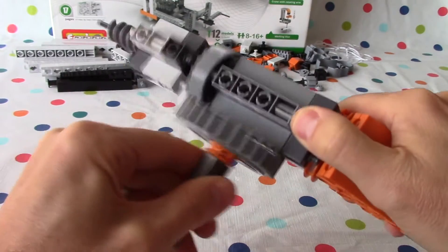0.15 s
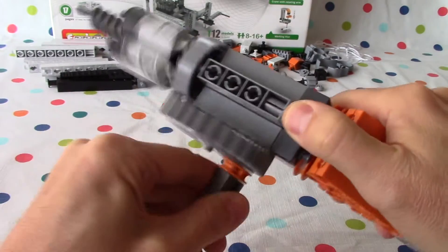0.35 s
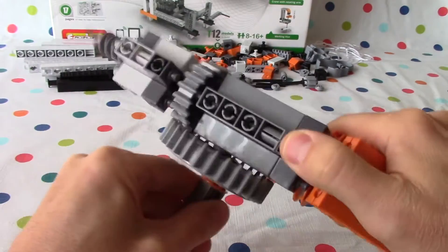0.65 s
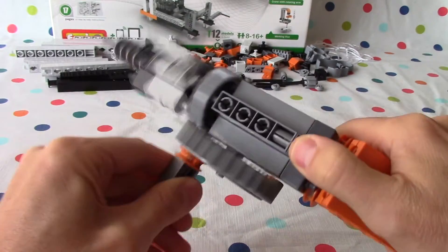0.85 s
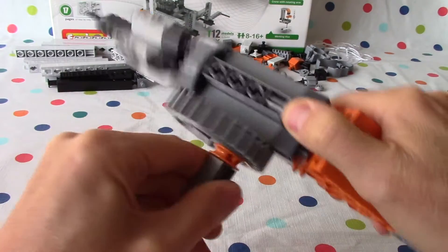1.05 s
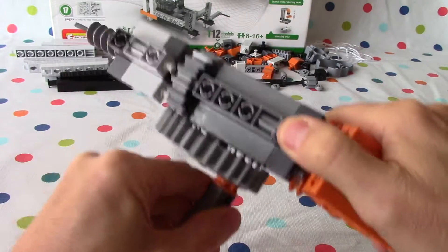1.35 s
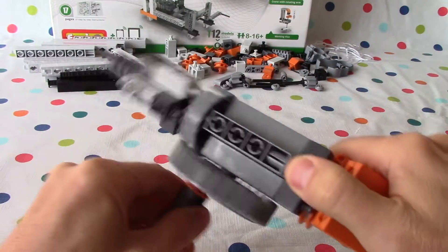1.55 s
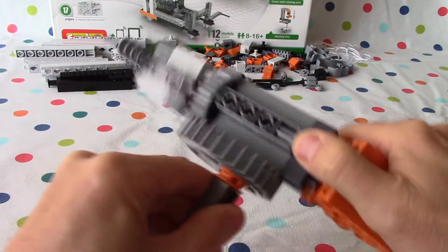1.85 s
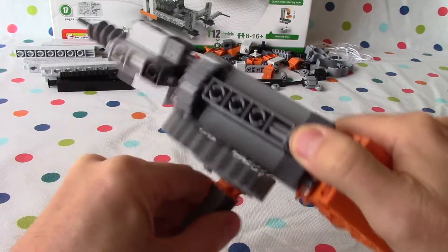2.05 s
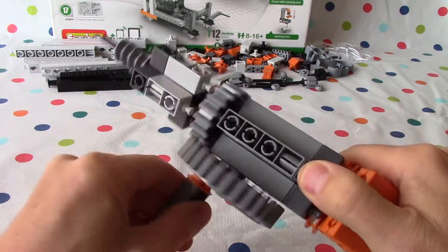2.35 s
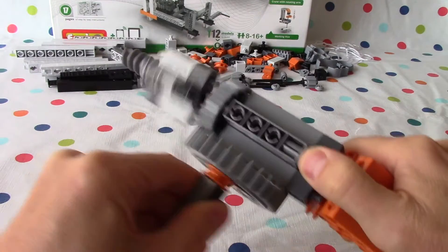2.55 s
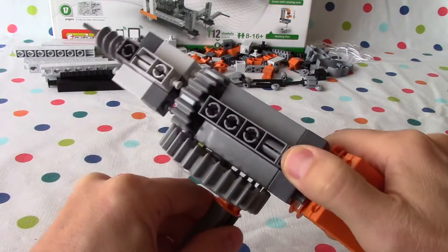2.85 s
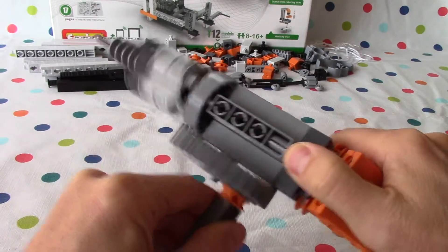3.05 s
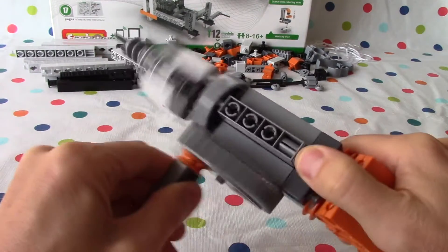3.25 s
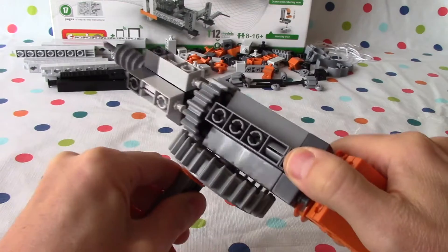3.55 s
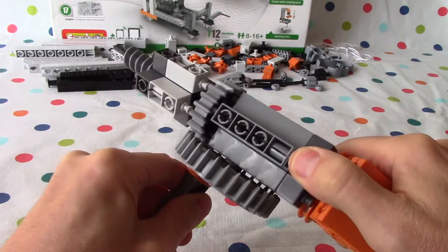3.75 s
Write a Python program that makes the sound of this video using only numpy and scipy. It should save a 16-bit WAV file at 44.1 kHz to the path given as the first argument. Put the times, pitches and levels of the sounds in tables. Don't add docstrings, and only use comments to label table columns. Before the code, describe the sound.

Plastic toy gears clatter and rasp in uneven hand-cranked bursts, close up in a quiet room

```python
import sys
import numpy as np
from scipy import signal
from scipy.fft import rfft, irfft, next_fast_len
from scipy.io import wavfile
from scipy.ndimage import map_coordinates

SR = 44100
rng = np.random.default_rng(int(sys.argv[2]) if len(sys.argv) > 2 else 0)


def convert_level_to_amplitude(level_db):
    exponent = np.asarray(level_db, float) / 20
    return 10 ** exponent


def generate_wav(signal):
    frames = np.transpose(np.atleast_2d(signal))
    scaled = np.clip(frames, -1, 1) * 32767
    pcm = np.round(scaled).astype(np.int16)
    wavfile.write(sys.argv[1], SR, pcm)


N = 171990

# start t/s, length t/s, rub level/dB, low thud level/dB
STROKES = [(0.144, 0.057, -26.5, -32), (0.273, 0.1, -33, -5.5), (0.546, 0.035, -10, 10),
           (0.635, 0.16, -40, -9), (0.929, 0.17, -25, -13.5), (1.237, 0.062, -20, -2),
           (1.415, 0.13, -20.5, 11), (1.57, 0.3, -51.5, 1.5), (1.674, .11, -32.5, -11),
           (1.82, 0.18, -25, -53), (1.977, 0.14, -29, 1.5), (2.225, 0.044, -13, 2), (2.356, 0.11, -53, -16),
           (2.451, 0.3, -23, -11.5), (2.945, 0.094, -61, 12), (3.013, 0.122, -15, -20),
           (3.242, 0.046, -20, -6), (3.291, 0.056, -16, -4.5), (3.414, .02, -52, -6)]


def unit(x):
    return x / np.sqrt(np.mean(x ** 2) + 1e-20)


def along(points, hz):
    f, value = np.transpose(points)
    return np.interp(np.log(hz + 1), np.log(f + 1), value)


def nearest(rows, at_s):
    s, value = np.transpose(rows)
    distance = np.abs(at_s[:, None] + 0.005 - s)
    return value[distance.argmin(1), None]


def wobble(rate):
    knots = rng.standard_normal(int(N * rate / SR) + 4)
    return map_coordinates(knots, [np.arange(N) * rate / SR])


def lay(rows, starts):
    at = starts[:, None] + np.arange(rows.shape[1])
    return np.bincount(at.ravel(), rows.ravel(), N + SR)[:N]


def impacts(size, per_s, spread_db):
    chance, extra, sign = rng.random(size), rng.exponential(size=size), rng.standard_normal(size)
    happens = np.clip((per_s / SR - chance) * SR / 300 + 0.5, 0, 1)
    return unit(happens * sign * convert_level_to_amplitude(spread_db * np.minimum(extra, 2)))


def resonance(f, hz, width):
    return 1j * f * width / (hz ** 2 - f * f + 1j * f * width)


def body(x, at_s):
    # f/Hz, width f/Hz, level/dB
    frame_rings = [(690, 120, -2), (1000, 150, 3), (1700, 250, -2), (2500, 250, 0), (3300, 300, 2),
                   (4150, 300, 0), (5800, 250, 1), (6700, 350, 2), (8600, 500, 1)]
    # f/Hz, level/dB
    plastic = [(90, -62.5), (250, -9), (900, 1.5), (3200, -2.5), (5000, -6), (7000, -7), (13000, -18),
               (16000, -30)]
    grip = np.array([0.5, 1, 2, 0.5, 0.5, 1, 2, 2, 0.5, -0.5, 0, 1.5, -2, 1, 2, 0.5, 0.5, 0.5, -3])
    # t/s, f/Hz
    low_ring = [(0.197, 1580), (0.241, 1630), (0.271, 1660), (0.354, 1910), (0.399, 1640), (0.576, 1680),
                (0.72, 1010), (0.75, 2130), (0.8, 990), (0.872, 1600), (0.913, 880), (0.981, 890),
                (1.014, 1560), (1.045, 1580), (1.26, 2070), (1.318, 1030), (1.416, 1270), (1.447, 1104),
                (1.521, 1860), (1.585, 1560), (1.689, 1650), (1.733, 1410), (1.785, 796), (1.865, 1170),
                (1.907, 1620), (1.965, 900), (2.016, 780), (2.064, 1210), (2.27, 1830), (2.31, 1870),
                (2.434, 1720), (2.473, 1380), (2.505, 1400), (2.56, 1860), (2.609, 1850), (2.656, 1690),
                (2.691, 846), (2.743, 1085), (3.029, 1960), (3.097, 1600), (3.138, 1060), (3.225, 1640),
                (3.257, 910), (3.299, 2000), (3.328, 934)]
    # t/s, f/Hz
    high_ring = [(0.327, 3760), (0.358, 3470), (0.398, 3700), (0.563, 3150), (0.61, 2170), (0.644, 3120),
                 (0.718, 6950), (0.747, 5340), (0.8, 2390), (0.855, 2270), (0.904, 2460), (0.962, 2830),
                 (1.014, 2230), (1.112, 3060), (1.257, 3500), (1.444, 2880), (1.474, 5560), (1.519, 2570),
                 (1.585, 2280), (1.643, 2280), (1.73, 2880), (1.785, 2800), (1.852, 3900), (1.904, 3050),
                 (1.962, 3100), (2.013, 3200), (2.049, 3000), (2.08, 3280), (2.257, 5820), (2.463, 2350),
                 (2.519, 2900), (2.559, 2760), (2.606, 4040), (2.65, 3220), (2.744, 3540), (3.039, 2310),
                 (3.138, 2270), (3.174, 3650), (3.245, 2390), (3.325, 5550)]
    # t/s, f/Hz
    lone_ring = [
        (2.356, 8500),
        (2.407, 2400),
        (2.941, 3350),
    ]
    ring_db, scatter_db, tilt_scatter_db = 1, 5, 1.5
    thud_hz = 653

    m = x.shape[1]
    f = np.fft.rfftfreq(m, 1 / SR)
    start, _, _, thud_db = np.transpose(STROKES)
    push = np.clip(np.searchsorted(start - 0.025, at_s) - 1, 0, None)
    ring_hz, width, db = np.transpose(frame_rings)
    shake = np.clip(rng.standard_normal((len(x), 2, len(ring_hz) + 1)), -2, 1.5)

    tilt_db = grip[push] + tilt_scatter_db * shake[:, 1, -1]
    octaves = np.log2(np.clip(f, 700, 12000) / 2500)
    colour_db = along(plastic, f) + tilt_db[:, None] * octaves
    colour_db = colour_db + thud_db[push, None] / (1 + (f / thud_hz) ** 4)
    cepstrum = irfft(np.log(convert_level_to_amplitude(colour_db) + 1e-6), m)
    cepstrum[:, 1:m // 2] *= 2
    cepstrum[:, m // 2 + 1:] = 0

    ring_hz = ring_hz * (1 + 0.03 * shake[:, 0, :-1])
    ring = 0
    for k in range(len(width)):
        strength = convert_level_to_amplitude(ring_db + db[k] + scatter_db * shake[:, 1, k:k + 1])
        ring = ring + strength * resonance(f, ring_hz[:, k:k + 1], width[k])
    low_hz = nearest(low_ring, at_s)
    high_hz = nearest(high_ring + lone_ring, at_s)
    ring = ring + convert_level_to_amplitude(8) * resonance(f, low_hz, low_hz / 5)
    ring = ring + convert_level_to_amplitude(8) * resonance(f, high_hz, high_hz / 8)

    response = np.exp(rfft(cepstrum)) * (1 + ring)
    strength = np.sqrt(np.mean(np.abs(response) ** 2, 1, keepdims=True))
    return irfft(rfft(x) * response / strength, m)


def tinted(gain):
    return unit(irfft(rfft(rng.standard_normal((2, N))) * gain, N))


def murmur():
    # f/Hz, level/dB per Hz
    air_colour = [(30, -96), (100, -31.5), (200, -6.5), (420, -8), (1100, -11.5), (3000, -26),
                  (7000, -36.5), (12500, -49.5), (16000, -73)]
    # f/Hz, width f/Hz, level/dB
    duct_tones = [(315, 28, -66), (407.3, 3.1, -65)]
    air_db, side_db = -60, -10.5
    f = np.fft.rfftfreq(N, 1 / SR)
    air = convert_level_to_amplitude(air_db + 0.46 * wobble(18)) * tinted(convert_level_to_amplitude(along(air_colour, f)))
    for hz, width, db in duct_tones:
        air = air + convert_level_to_amplitude(db) * tinted(1 / (1 + ((f - hz) / width) ** 2))
    return air * convert_level_to_amplitude(np.array([[0], [side_db]]))


def rub():
    edge_s, slips_per_s, spread_db = 0.02, 6900, 2.5
    rub_db, wobble_db = -12, 3
    t = np.arange(N) / SR
    force = np.zeros(N)
    for start, length, db, _ in STROKES:
        to_edge = np.minimum(t - start, start + length - t)
        force += convert_level_to_amplitude(db) * np.clip(to_edge / edge_s + 0.5, 0, 1) ** 2
    slips = impacts(N, slips_per_s, spread_db) * force * convert_level_to_amplitude(rub_db + wobble_db * wobble(70))
    hop = 1024
    starts = np.arange(0, N - 2 * hop, hop)
    pieces = slips[starts[:, None] + np.arange(2 * hop)] * np.hanning(2 * hop)
    pieces = np.pad(pieces, ((0, 0), (0, 2 * hop)))
    return lay(body(pieces, (starts + hop) / SR), starts)


def catches():
    # t/s, peak level/dB, chatter t/s
    teeth = [(0.1556, -28, 0.018), (0.18, -21.5, 0.049), (0.221, -30.5, 0.012), (0.237, -20.5, 0.0094),
             (0.265, -28, 0.03), (0.3047, -17, 0.013), (0.3127, -14.5, 0.044), (0.3497, -12, 0.034),
             (0.3718, -11, 0.026), (0.3945, -15.5, 0.016), (0.527, -34, 0.02), (0.5387, -29, 0.0098),
             (0.5513, -8.5, 0.064), (0.562, -9, 0.035), (0.57, -16, 0.054), (0.583, -8.5, 0.023),
             (0.607, -21, 0.021), (0.6378, -16, 0.03), (0.678, -18, 0.052), (0.6939, -10.5, 0.018),
             (0.7134, -11.5, 0.025), (0.7336, -18, 0.017), (0.7434, -9, 0.027), (0.7804, -12, 0.023),
             (0.7938, -9, 0.026), (0.818, -13, 0.034), (0.8395, -14, 0.055), (0.8695, -24, 0.02),
             (0.8974, -25, 0.081),
             (0.931, -15, 0.011), (0.9585, -13, 0.049), (1.0092, -8, 0.029), (1.0277, -10, 0.051),
               (1.098, -13.5, 0.045), (1.1101, -17, 0.027), (1.2294, -24, 0.014), (1.2464, -8, 0.035),
               (1.2551, -3, 0.034), (1.2774, -11.5, 0.015), (1.2961, -30.5, 0.041), (1.333, -23, 0.01),
               (1.416, -13, 0.0046), (1.4374, -8.5, 0.025), (1.4458, -8, 0.046), (1.4536, -9.5, 0.011),
               (1.462, -12, 0.005), (1.4703, -4, 0.017), (1.486, -18.5, 0.016), (1.507, -11, 0.038),
               (1.5304, -25, 0.0074), (1.5582, -23.5, 0.015), (1.579, -15, 0.019), (1.631, -21.5, 0.04),
               (1.641, -25, 0.025), (1.66, -21.5, 0.02), (1.676, -35, 0.012), (1.6862, -21, 0.08),
             (1.726, -8.5, 0.036), (1.747, -17, 0.02), (1.7796, -10, 0.019), (1.7948, -9, 0.018),
               (1.8482, -11.5, 0.033), (1.9014, -14, 0.024), (1.936, -18.5, 0.013), (1.943, -7, 0.027),
               (1.9589, -6.5, 0.03), (1.9931, -11.5, 0.078), (2.0122, -5.5, 0.012), (2.027, -20.5, 0.028),
               (2.0483, -8, 0.0074), (2.061, -5.5, 0.0096), (2.0727, -8, 0.045), (2.093, -10, 0.01),
               (2.211, -25.5, 0.027), (2.2405, -9.5, 0.014), (2.247, -1.5, 0.0099), (2.2545, -3.5, 0.016),
               (2.2643, -1.5, 0.017), (2.283, -12, 0.044), (2.2978, -15.5, 0.014), (2.3049, -12, 0.013),
               (2.354, -34, 0.01), (2.377, -34, 0.011), (2.4063, -37, 0.012),
             (2.4292, -16, 0.02), (2.47, -19, 0.033), (2.5015, -16, 0.03), (2.5189, -20.5, 0.023),
               (2.5547, -13, 0.021), (2.5778, -19, 0.03), (2.601, -10, 0.044), (2.648, -7.5, 0.034),
               (2.6666, -8, 0.05), (2.6835, -18.5, 0.035), (2.7281, -11.5, 0.044), (2.7424, -9.5, 0.021),
               (2.9394, -38, 0.015), (2.9612, -34, 0.018), (2.989, -32, 0.015), (2.996, -21, 0.047),
               (3.022, -17.5, 0.034), (3.053, -15.5, 0.025), (3.0945, -16, 0.033), (3.1097, -11, 0.0096),
               (3.131, -9, 0.031), (3.1554, -16, 0.025), (3.173, -25, 0.05), (3.22, -15.5, 0.021),
               (3.24, -20, 0.025), (3.2888, -9.5, 0.023), (3.319, -7, 0.027), (3.3366, -9, 0.031),
               (3.431, -35.5, 0.01), (3.519, -46, 0.015)]
    knocks_per_s, spread_db = 7000, 2
    rise_share, fall_power, catch_db = 0.045, 1.507, -10
    s, db, length = np.transpose(teeth)
    t = np.arange(4096) / SR
    knocks = impacts((len(s), len(t)), knocks_per_s, spread_db)
    length = np.clip(length, 0.006, 0.07)[:, None]
    progress = t / length
    rise = 1 - np.exp(-progress / (rise_share * length / 0.025))
    shape = rise * convert_level_to_amplitude(-40 * progress ** fall_power) * (t < 0.075)
    chatter = knocks * shape
    wanted = np.linalg.norm(shape, axis=1, keepdims=True)
    chatter = chatter * wanted / np.linalg.norm(chatter, axis=1, keepdims=True)
    level = convert_level_to_amplitude(db + catch_db)[:, None]
    return lay(body(chatter, s) * level, np.round(s * SR).astype(int))


def room(x):
    # f/Hz, t/s
    fade = [(300, 0.13), (2000, 0.2), (6000, 0.1), (12000, 0.085)]
    room_db, side_db = -13.5, -19
    out = np.zeros((2, N))
    part = np.arange(N) * 3 // SR % 4
    for k in range(4):
        hz, t, z = signal.stft(rng.standard_normal((2, SR // 3)), SR, nperseg=256)
        fading = convert_level_to_amplitude(-60 * t / along(fade, hz)[:, None])
        tail = signal.istft(z * fading, SR, nperseg=256)[1]
        tail = tail / np.linalg.norm(tail[0])
        late = np.pad(x * (part == k), (200, 0))
        out += signal.fftconvolve(late[None], tail, axes=1)[:, :N]
    return out * convert_level_to_amplitude(np.array([[room_db], [room_db + side_db]]))


def pin():
    # t/s, peak level/dB
    settle = [
        (3.7488, -35),
    ]
    # f/Hz, level/dB, time to fade by 60 dB t/s
    pin_rings = [(2045, -16, 0.027), (5565, -8, 0.017), (6040, -32, 0.037), (6750, -11.5, 0.014)]
    t = np.arange(SR // 10) / SR
    ring = np.zeros(len(t))
    for hz, db, t60 in pin_rings:
        ring += convert_level_to_amplitude(db - 60 * t / t60) * np.sin(2 * np.pi * hz * t)
    ring *= (1 - np.exp(-t / 0.0006)) ** 2
    s, db = np.transpose(settle)
    return lay(convert_level_to_amplitude(db + 3)[:, None] * ring, np.round(s * SR).astype(int))


def scene():
    direct_side_db = -23.5
    toy = rub() + catches() + pin()
    mid, side = room(toy) + murmur()
    side = side + convert_level_to_amplitude(direct_side_db) * np.gradient(toy)
    return np.array([toy + mid + side, toy + mid - side])


def band_limit(x):
    return signal.sosfilt(signal.butter(12, 16520, fs=SR, output="sos"), x)


def record(dry):
    top_hz, edge_hz = 15800, 500
    m = next_fast_len(N + 4096)
    rounded = dry / (1 + (dry / 0.6) ** 6) ** (1 / 6)
    f = np.fft.rfftfreq(m, 1 / SR)
    treble_edge = np.clip((top_hz - f) / edge_hz + 0.5, 0, 1)
    mix = irfft(rfft(rounded, m) * treble_edge, m)[:, :N]
    return band_limit(mix)


dry = scene()
out = record(dry)
generate_wav(out)
```